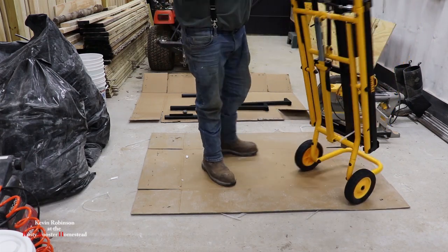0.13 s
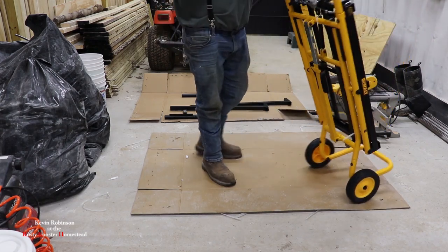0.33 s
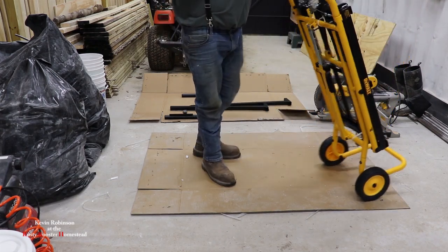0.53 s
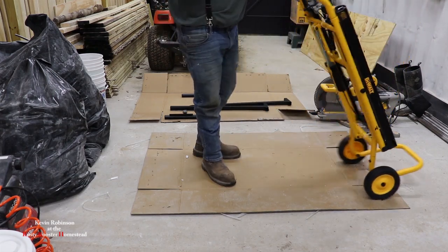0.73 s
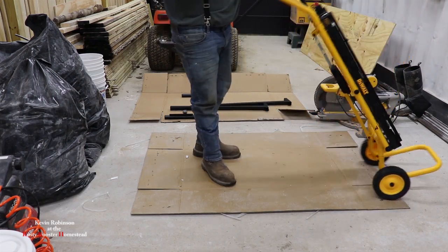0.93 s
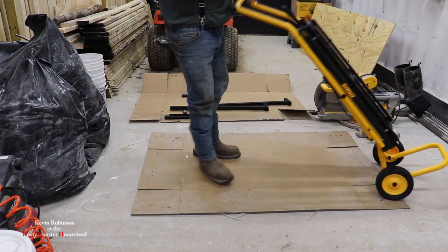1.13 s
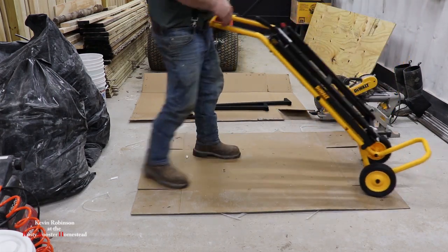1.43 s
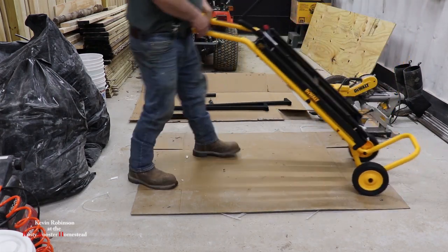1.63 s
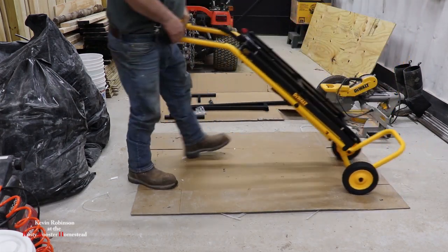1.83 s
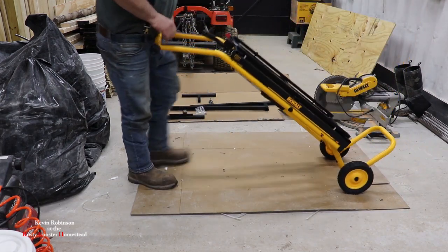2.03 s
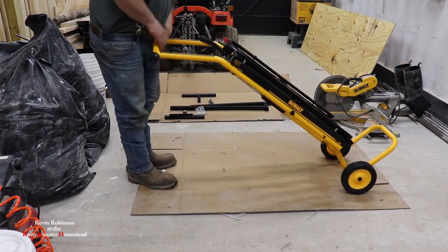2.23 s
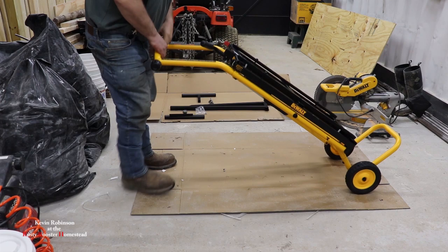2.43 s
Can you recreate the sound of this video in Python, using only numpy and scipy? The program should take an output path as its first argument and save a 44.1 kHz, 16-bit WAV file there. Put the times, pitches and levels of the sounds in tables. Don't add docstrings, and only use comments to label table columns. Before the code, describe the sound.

A folded wheeled steel stand gives small clacks at 0.25 s, then a very loud sharp metal crack at 0.33 with a dense half-second room tail. Another strong crack comes at 0.57, then lighter ticks. Soft boot scuffs and dull cardboard thumps fall around 1.1 and 1.6. From 1.88 to 2.1 tubing scrapes and squeaks high; a hard clack with a thump lands at 2.18, then faint ticks over quiet air hum.

```python
import sys
import numpy as np
from scipy import signal
from scipy.fft import rfft, irfft, next_fast_len
from scipy.io import wavfile
from scipy.ndimage import uniform_filter1d

SR = 44100
rng = np.random.default_rng(int(sys.argv[2]) if len(sys.argv) > 2 else 0)


def bounce(signal):
    frames = np.transpose(np.atleast_2d(signal))
    limited = np.clip(frames, -1, 1)
    pcm = np.round(limited * 32767).astype(np.int16)
    wavfile.write(sys.argv[1], SR, pcm)


def nominal_scale(level):
    x = np.asarray(level, float) / 20
    return 10 ** x


N = 114660

# (frequency [Hz], density [dB per Hz])
AIR_SPECTRUM = [(24, -14), (40, -3), (120, -3), (229, -6.5), (280, -6), (461, -8.5), (2270, -12),
                (8000, -18.5), (15500, -25)]
# (start [s], length [s], level [dB], low edge [Hz], high edge [Hz])
SCUFFS = [(0.133, 0.034, -50.5, 1500, 9600), (.247, 0.0056, -32, 655, 1970),
          (0.332, 0.045, -32.5, 810, 1790), (1.218, 0.071, -58, 8000, 15600),
          (1.395, 0.056, -57, 9000, 15600), (1.587, 0.11, -44, 9000, 15600),
          (2.418, 0.06, -56.5, 9000, 15600), (0.413, .05, -48, 9000, 15600),
          (1.076, 0.012, -35.5, 830, 2270), (1.11, .06, -46, 1500, 4400), (1.586, .008, -37, 500, 4040),
          (2.205, 0.033, -33.5, 1500, 7100), (0.327, 0.065, -28, 2030, 9600),
          (0.569, 0.049, -39.5, 417, 3260), (0.677, 0.19, -51.5, 1110, 5200),
          (0.861, 0.16, -49, 1490, 14000), (1.576, 0.018, -40.5, 890, 2980),
          (1.601, 0.048, -48.5, 120, 448), (1.86, 0.06, -45, 6000, 15000), (0.959, 0.016, -35, 2470, 15900),
          (1.096, 0.074, -41.5, 298, 1500), (1.201, 0.071, -40, 435, 3300), (1.388, 0.17, -53, 1810, 13700),
          (1.592, 0.028, -29.5, 457, 6000), (1.63, 0.038, -36.5, 302, 5500),
          (1.969, 0.023, -31.5, 6000, 15520), (2.11, 0.036, -42, 945, 1270),
          (2.183, 0.048, -30.5, 915, 8950), (2.462, 0.019, -46, 397, 6000)]
# (time [s], peak [dB], pitch [Hz], room send [dB], bright edge [dB])
CRACKS = [(.137, -44, 1800, -55, -6), (0.178, -32, 4130, -36, -2), (0.243, -14, 2460, -14.5, -2),
          (.249, -13, 2250, -27, -4), (0.279, -27, 1250, -43, -10), (.294, -28, 1100, -43, -10),
          (0.3267, 1, 2620, -1, 1.5), (0.574, -5.5, 2190, -10, 2), (.583, -17.5, 1500, -37, -24),
          (.688, -24, 2970, -26, -14), (.728, -19.5, 2870, -20, 1), (.961, -21.5, 3400, -19.5, -13),
          (0.971, -16, 5840, -30, -13), (1.031, -20, 1280, -23, 7), (1.076, -29, 1470, -19, -21),
          (1.146, -22.5, 1830, -30, -27), (1.242, -26, 1480, -30, -16), (1.716, -21, 4200, -18, -2),
          (1.883, -31, 3000, -34, -4), (2.107, -14, 1490, -27.5, -26), (2.116, -19.5, 1160, -34, -20),
          (2.182, -9, 2700, -5.5, -0.5), (2.222, -13, 1830, -20, -10), (2.359, -25.5, 1850, -34, -15.5),
          (2.483, -28.5, 2220, -38, -12.5), (.1666, -38, 12000, -42, -15), (.522, -31, 14000, -38, -20),
          (.617, -38, 13000, -38, -20), (.991, -32, 14500, -40, -20), (1.0735, -34, 13500, -38, -20),
          (1.231, -38, 12000, -38, -15), (1.544, -37, 14500, -40, -20), (1.93, -28, 10500, -36, -7)]
# (time [s], peak [dB], pitch [Hz])
THUMPS = [(.417, -28.5, 186), (1.093, -33.5, 142), (1.111, -26, 460), (1.119, -24, 430),
          (1.145, -25.5, 440), (1.1, -31, 390), (1.3, -30, 410), (1.208, -33.5, 270), (1.217, -34.5, 250),
          (1.596, -28, 440), (1.6, -35, 133), (1.655, -34, 150), (1.676, -33.5, 138), (1.63, -33, 224),
          (0.52, -38, 410), (.246, -46, 440), (2.183, -21, 250), (2.252, -26, 247), (2.288, -32, 226),
          (2.4, -35.5, 130), (2.277, -36, 105), (2.51, -41, 245), (2.481, -33.5, 250), (2.478, -37.5, 530)]
# (time [s], peak [dB], frequency [Hz], T60 [s])
RINGS = [(.252, -32, 1001, .05), (.253, -29, 1416, .05), (.247, -31, 1965, .05), (.246, -28, 2304, .05),
         (.338, -24, 1030, .08), (.362, -31, 960, .06), (.33, -27, 2720, .06), (2.185, -27, 3150, .05),
         (1.882, -31, 4505, .1), (1.914, -28, 4500, .12), (1.935, -34, 4510, .12), (1.956, -26, 4498, .13),
         (1.995, -39, 4505, .15), (2.022, -33, 4520, .1), (2.039, -26, 4490, .06), (2.065, -37, 4510, .15),
         (2.11, -42, 4510, .1), (1.884, -35, 2110, .06), (1.94, -38, 2116, .08), (1.96, -38, 2110, .06)]
# (start [s], length [s], level [dB], mode [Hz])
TUBE_SLIPS = [(1.93, 0.024, -37.5, 4860), (1.972, 0.06, -51, 4000), (2.02, 0.0164, -37, 3900),
              (1.885, 0.0265, -41, 2110), (1.8, 0.023, -46, 2280), (1.936, 0.019, -39.5, 2100),
              (1.94, 0.026, -37.5, 2900), (1.975, 0.064, -45, 2960), (1.978, 0.05, -48, 1314),
              (2.026, 0.013, -37.5, 3100), (2.045, 0.036, -41.5, 3350), (2.02, 0.03, -40.5, 3700),
              (2.1, 0.025, -44, 5000), (2.025, .06, -48, 5850), (2.2, 0.01, -33, 7240),
              (1.98, 0.0053, -37, 10000), (2.054, 0.035, -41, 1590), (2.106, 0.0021, -34, 1590),
              (2.113, 0.0055, -37, 1180), (2.13, 0.046, -52, 1180)]
TUBE_MODES_HZ = np.array([1180, 1314, 1590, 2116, 2886, 3350, 4505, 4790, 5000, 5850, 7240, 9220])
# (time [s], level [dB])
RASP_LEVEL = [
    (1.85, -40),
    (1.868, -46.5),
    (1.888, -27),
    (1.896, -35.5),
    (1.96, -28),
    (2.014, -34.5),
    (2.028, -25.5),
    (2.12, -41),
]
# (frequency [Hz], T60 [s])
ROOM_T60 = [(100, 0.2), (300, 0.42), (800, 0.47), (2000, 0.54), (5000, 0.59), (9000, 0.46), (14000, 0.4)]
# (frequency [Hz], level [dB])
ROOM_COLOUR = [(100, 10.5), (500, 4), (1200, 4.5), (4000, 0), (9000, -3), (14000, -7.5)]
# (frequency [Hz], correlation [0-1])
LIKENESS = [(60, 0.96), (250, 0.94), (500, .76), (1000, 0.55), (2000, 0.1), (5000, 0.03), (9000, 0.0),
            (14000, 0.0)]
# (frequency [Hz], level [dB])
BALANCE = [(500, 0), (2000, -2), (8000, -.3), (13000, -4.5)]
# (frequency [Hz], phase [rad])
LEFT_LEAD = [(100, 0), (2000, -.5), (4700, -.3), (7000, 2.2), (9000, 2.3), (12500, 1.6), (16000, 1.6)]

AIR_DB = -51
GRAINS_PER_S, GRAIN_SPREAD_DB = 5000, 3
SCUFF_ATTACK_SHARE, SCUFF_RELEASE_S, SCUFF_ROOM_DB = 0.065, 0.01, -2.5
CRACK_DECAY_S, CRACK_RISE_S, CRACK_DELAY_S, CRACK_SNAP = 0.0006, 0.0002, 0.0005, 1.8
CRACK_WIDTH, CRACK_LOW_HZ, CRACK_HIGH_HZ = 0.5, 700, 9500
THUMP_T60_CYCLES, THUMP_ROOM_DB = 7, -13
RING_RISE_S, RING_ROOM_DB, RING_FLUTTER, FLUTTER_HZ = 0.002, -13, 0.3, 120
SLIPS_PER_S, SLIP_SPREAD_DB, SLIP_FADE_S, TUBE_T60_S, TUBE_ROOM_DB = 2500, 3.5, 0.002, 0.04, -7
RASP_DB, RASP_LOW_HZ, RASP_HIGH_HZ = -6, 990, 6000
ROOM_DB, ROOM_BUILD_S = 2.5, 0.0017
EVEN_FINE_HZ, EVEN_BROAD_HZ = 40, 500
PORT_LIMIT, PORT_LOW_HZ, PORT_HIGH_HZ = 1.3, 34, 15760
EVENT_T = np.arange(SR // 4) / SR


def rms_one(x):
    return x / np.sqrt(np.mean(x ** 2) + 1e-20)


def at_hz(points, hz):
    table_hz, values = np.transpose(points)
    return np.interp(np.log(hz), np.log(table_hz), values)


def band(x, low_hz, high_hz, order=1):
    edges_hz = [low_hz, min(high_hz, 0.45 * SR)]
    return signal.sosfilt(signal.butter(order, edges_hz, "band", fs=SR, output="sos"), x)


def add(out, x, start_s):
    i = int(start_s * SR)
    out[i:i + len(x)] += x[:N - i]


def grains(per_s, spread_db, size):
    chance, height, sign = rng.random((size, 3)).T
    hit = chance < per_s / SR
    return hit * nominal_scale(-spread_db * np.log(np.maximum(height, 0.01))) * np.sign(sign - 0.5)


def diffuse(gain_of_band, size):
    out = 0
    edges_hz = 30 * 2 ** np.arange(0, 9.6, 0.5)
    white = rng.standard_normal((2, 2, size))
    for k, (low_hz, high_hz) in enumerate(zip(edges_hz, edges_hz[1:])):
        mid, side = band(white[k % 2], low_hz, high_hz, order=2)
        centre_hz = np.sqrt(low_hz * high_hz)
        alike = np.clip(at_hz(LIKENESS, centre_hz), -1, 1)
        stereo = np.sqrt(1 + alike) * mid + np.sqrt(1 - alike) * side * [[1], [-1]]
        out = out + gain_of_band(centre_hz) * stereo
    return out


def air():
    return nominal_scale(AIR_DB) * rms_one(diffuse(lambda hz: nominal_scale(at_hz(AIR_SPECTRUM, hz)), size=N))


def scuffs():
    out, t = np.zeros(N), EVENT_T
    for start_s, length_s, db, low_hz, high_hz in SCUFFS:
        grit = band(grains(GRAINS_PER_S, GRAIN_SPREAD_DB, size=len(t)), low_hz, high_hz)
        grit = rms_one(band(grit, low_hz, 0.45 * SR))
        attack = np.minimum(t / (SCUFF_ATTACK_SHARE * length_s), 1)
        release = np.exp(-np.maximum(t - length_s, 0) / SCUFF_RELEASE_S)
        add(out, nominal_scale(db) * attack * release * grit, start_s)
    return out


def cracks():
    direct, to_room, t = np.zeros(N), np.zeros(N), np.arange(600) / SR
    click = t == 0
    for start_s, db, hz, room_db, edge_db in CRACKS:
        noise = rng.standard_normal(len(t))
        burst = noise * (1 - np.exp(-t / CRACK_RISE_S)) * np.exp(-t / CRACK_DECAY_S) + CRACK_SNAP * click
        pair = np.array([burst, click])
        pair /= np.linalg.norm(pair, axis=1, keepdims=True)
        edge = band(pair, CRACK_LOW_HZ, CRACK_HIGH_HZ, order=2)
        body = band(pair, hz / (1 + CRACK_WIDTH), hz * (1 + CRACK_WIDTH), order=2)
        x = body + nominal_scale(edge_db) * edge
        x = x / np.abs(x[0]).max()
        add(direct, nominal_scale(db) * x[0], start_s + CRACK_DELAY_S)
        add(to_room, nominal_scale(room_db) * x[1], start_s + CRACK_DELAY_S)
    return direct, to_room


def thumps():
    out, t = np.zeros(N), EVENT_T
    for start_s, db, hz in THUMPS:
        decay = nominal_scale(-60 * t * hz / THUMP_T60_CYCLES)
        rise = np.minimum(t * hz * 2, 1)
        add(out, nominal_scale(db) * np.sin(2 * np.pi * hz * t) * decay * rise, start_s)
    return out


def rings():
    out, t = np.zeros(N), EVENT_T
    for start_s, db, hz, t60_s in RINGS:
        rise = 1 - np.exp(-t / RING_RISE_S)
        add(out, nominal_scale(db - 60 * t / t60_s) * np.sin(2 * np.pi * hz * t) * rise, start_s)
    flutter = rms_one(band(rng.standard_normal(N), FLUTTER_HZ / 4, FLUTTER_HZ))
    return out * (1 + RING_FLUTTER * flutter)


def tube_mode(clicks, hz, t60_s):
    r, w = nominal_scale(-60 / (t60_s * SR)), 2 * np.pi * hz / SR
    return signal.lfilter([0, np.sin(w)], [1, -2 * r * np.cos(w), r * r], clicks + 1e-18)


def tube():
    out, t, modes_hz = np.zeros(N), EVENT_T, np.array(TUBE_MODES_HZ)
    for start_s, length_s, db, hz in TUBE_SLIPS:
        fade = np.exp(-np.maximum(t - length_s, 0) / SLIP_FADE_S)
        slips = grains(SLIPS_PER_S, SLIP_SPREAD_DB, size=len(t)) * fade
        nearest_hz = modes_hz[np.abs(modes_hz - hz).argmin()]
        x = tube_mode(slips, nearest_hz, TUBE_T60_S)
        add(out, nominal_scale(db) * x / np.std(x[t < length_s + SLIP_FADE_S]), start_s)
    time_s, db = np.transpose(RASP_LEVEL)
    level_db = np.interp(np.arange(N) / SR, time_s, db, left=-120, right=-120)
    grit = grains(GRAINS_PER_S, GRAIN_SPREAD_DB, size=N)
    rasp = rms_one(band(grit, RASP_LOW_HZ, RASP_HIGH_HZ, order=2))
    return out + nominal_scale(RASP_DB + level_db) * rasp


def workshop(x):
    t, lead = np.arange(SR) / SR, SR // 8
    build = 1 - np.exp(-t / ROOM_BUILD_S)
    tail = build * diffuse(lambda hz: nominal_scale(at_hz(ROOM_COLOUR, hz) - 60 * t / at_hz(ROOM_T60, hz)), size=SR)
    lines = rfft(np.roll(tail, lead, axis=1))
    power = np.sum(np.abs(lines) ** 2, axis=0) + 1e-12
    even = np.sqrt(uniform_filter1d(power, EVEN_BROAD_HZ) / uniform_filter1d(power, EVEN_FINE_HZ))
    lines = lines * np.where(np.arange(len(power)) > EVEN_BROAD_HZ, even, 1)
    tail = irfft(lines, SR)[:, lead:] * build[:SR - lead]
    tail = tail / np.sqrt(np.sum(tail ** 2) / 2)
    return nominal_scale(ROOM_DB) * signal.fftconvolve(x[None], tail, axes=1)[:, :N]


def scene():
    hiss, scuff, (crack, to_room) = air(), scuffs(), cracks()
    thump, tone, slide = thumps(), rings(), tube()
    to_room = to_room + nominal_scale(SCUFF_ROOM_DB) * scuff + nominal_scale(THUMP_ROOM_DB) * thump
    to_room = to_room + nominal_scale(RING_ROOM_DB) * tone + nominal_scale(TUBE_ROOM_DB) * slide
    return crack + scuff + thump + slide + tone + workshop(to_room) + hiss


def low_pass(x):
    return signal.sosfilt(signal.butter(12, 16970, fs=SR, output="sos"), x)


def record(dry):
    size = next_fast_len(N)
    hz = np.maximum(np.arange(size // 2 + 1) * SR / size, 1)
    left = nominal_scale(at_hz(BALANCE, hz) / 2) * np.exp(0.5j * at_hz(LEFT_LEAD, hz))
    limits = 1 + (hz / PORT_HIGH_HZ) ** 300 + (PORT_LOW_HZ / hz) ** 2
    spectrum = rfft(PORT_LIMIT * np.tanh(dry / PORT_LIMIT), size)
    mix = irfft(spectrum * [left, 1 / left] / limits, size)[:, :N]
    return low_pass(mix)


dry = scene()
out = record(dry)
bounce(out)
```